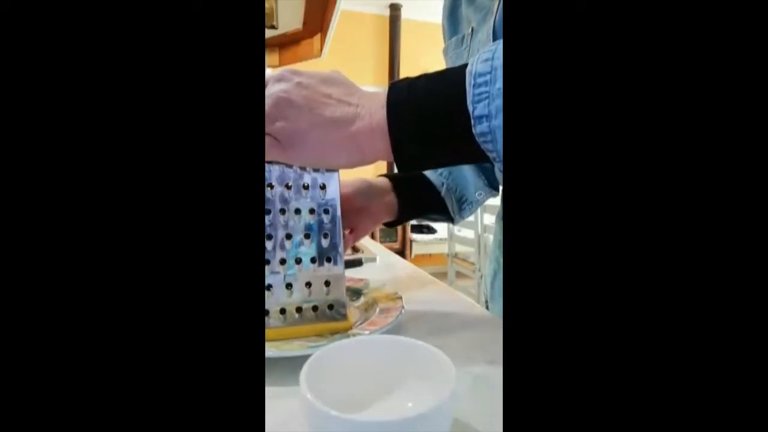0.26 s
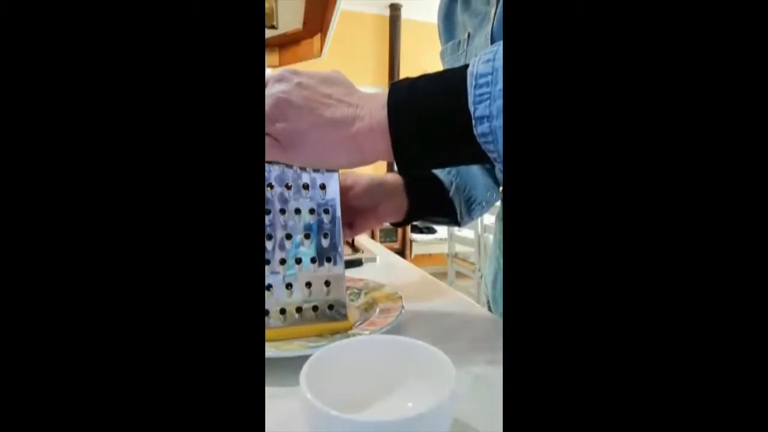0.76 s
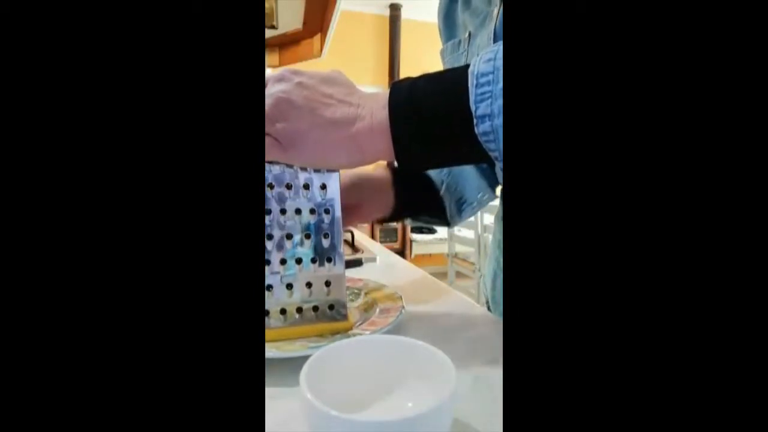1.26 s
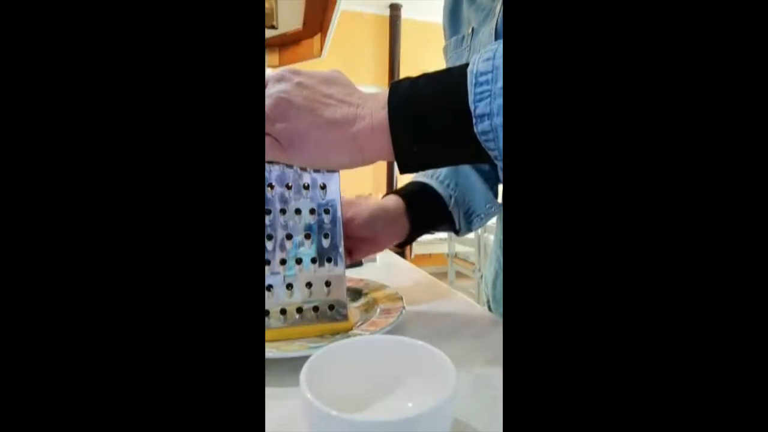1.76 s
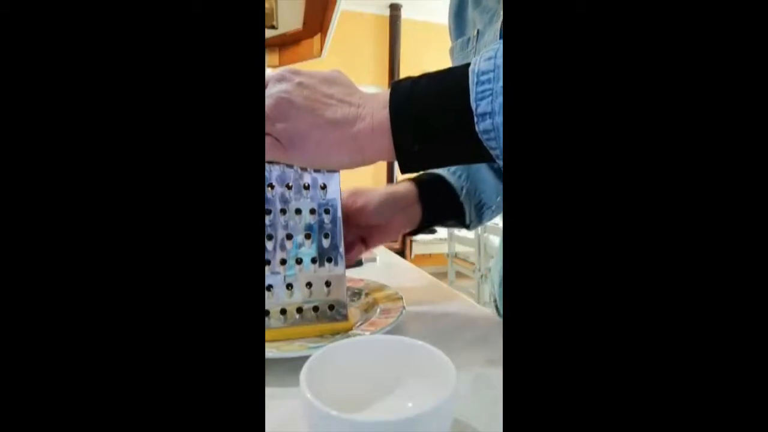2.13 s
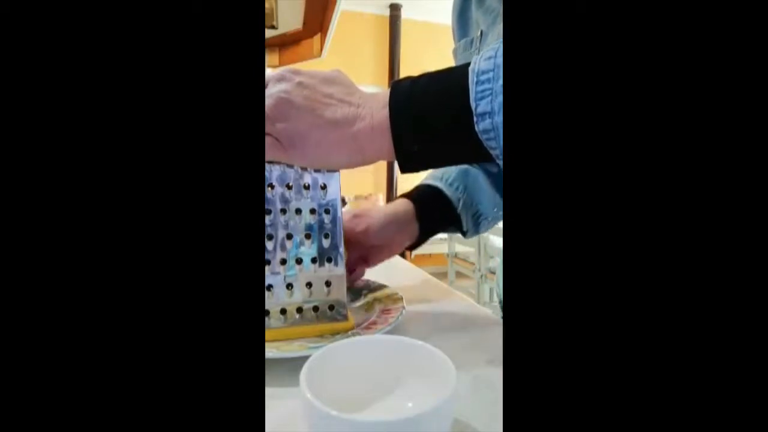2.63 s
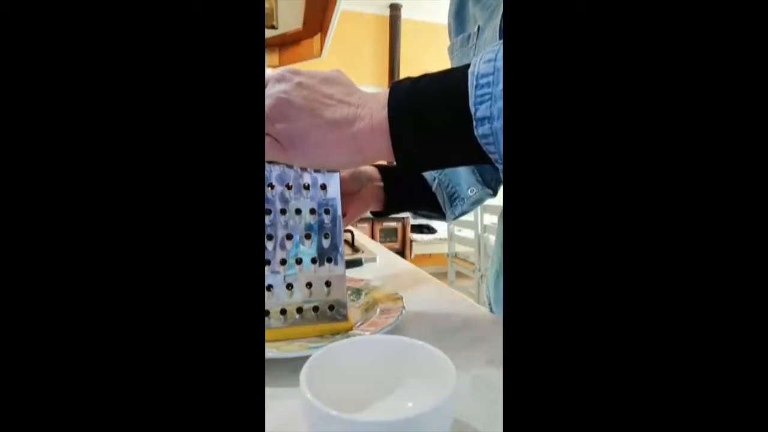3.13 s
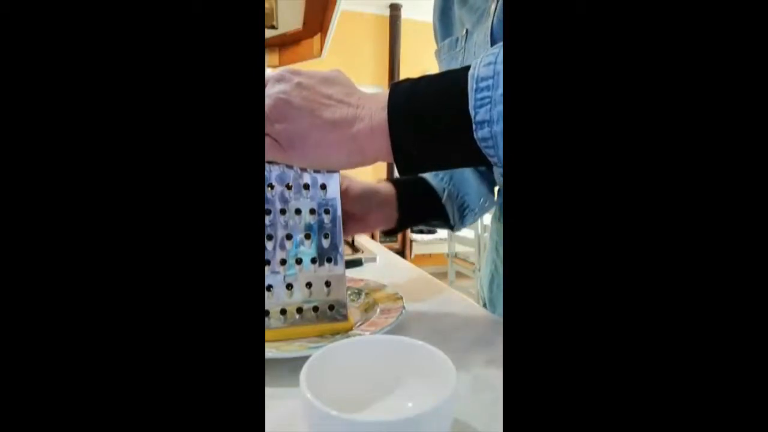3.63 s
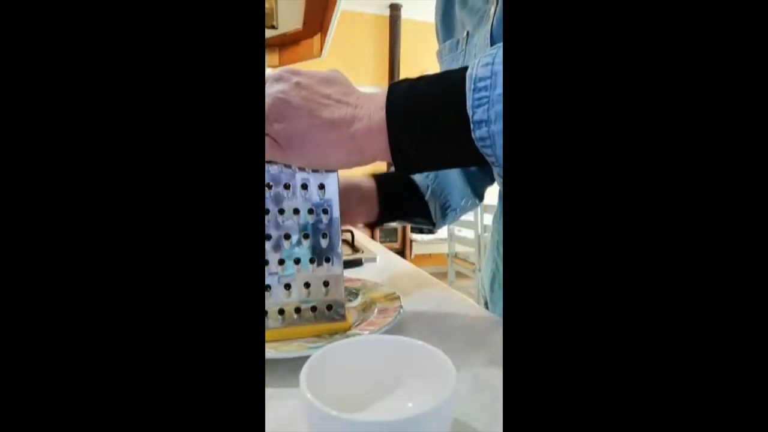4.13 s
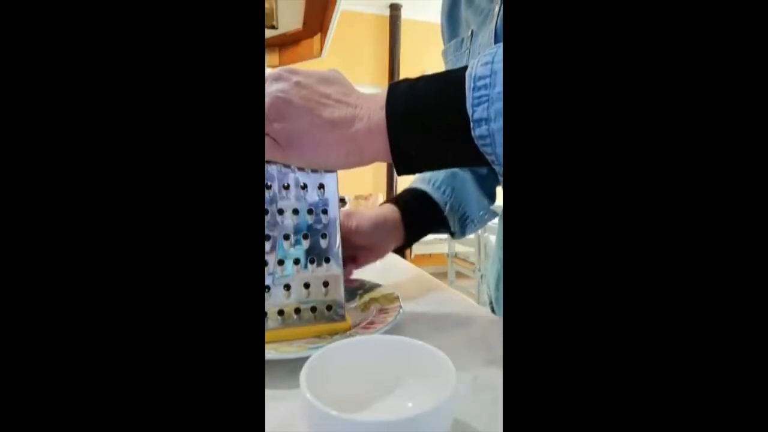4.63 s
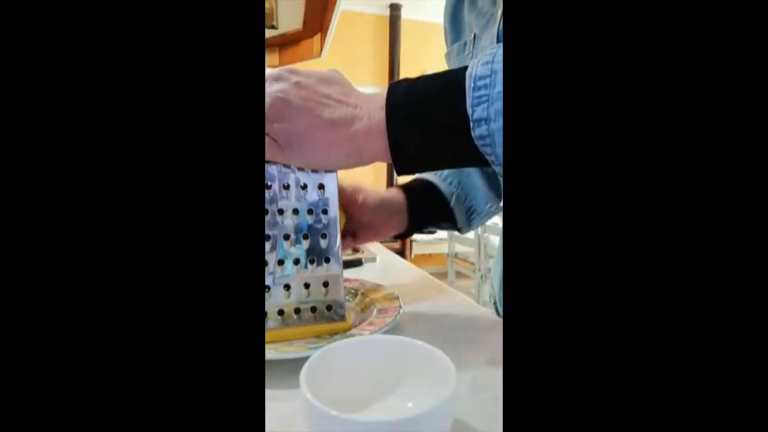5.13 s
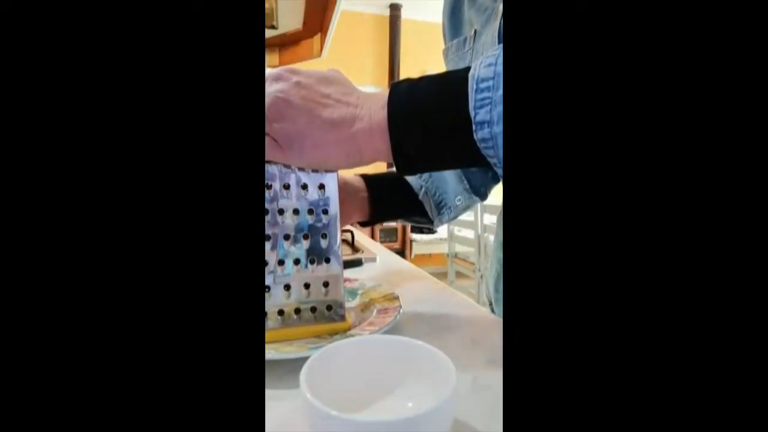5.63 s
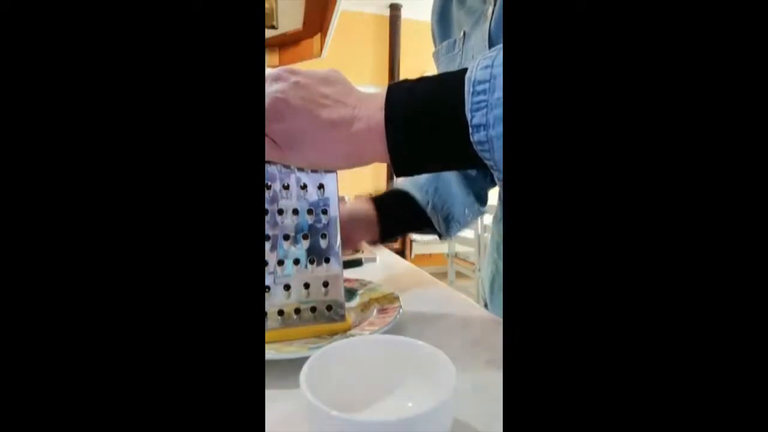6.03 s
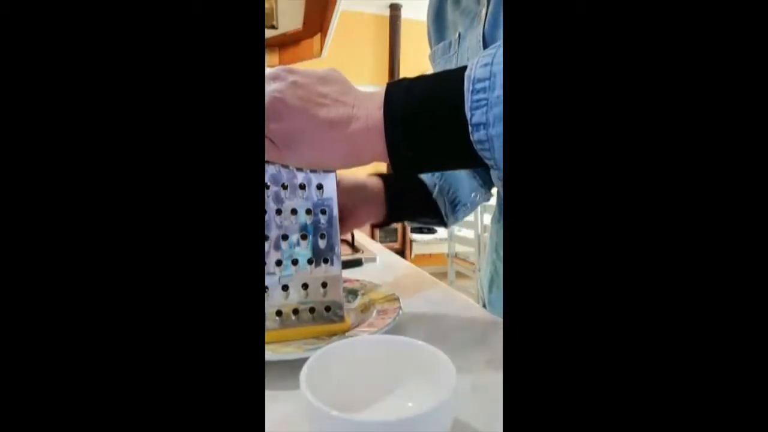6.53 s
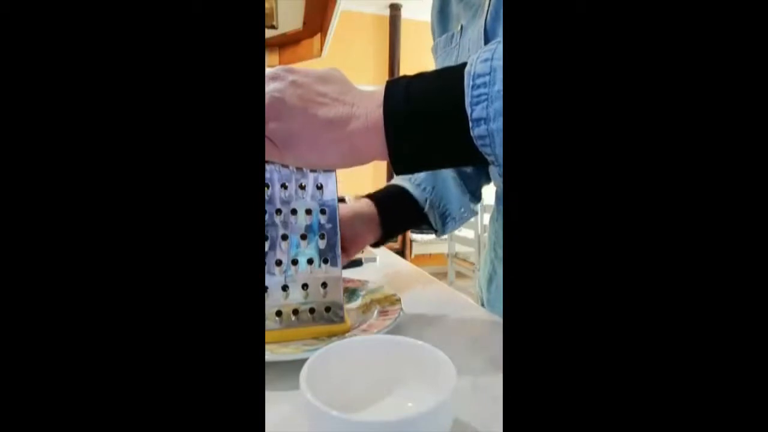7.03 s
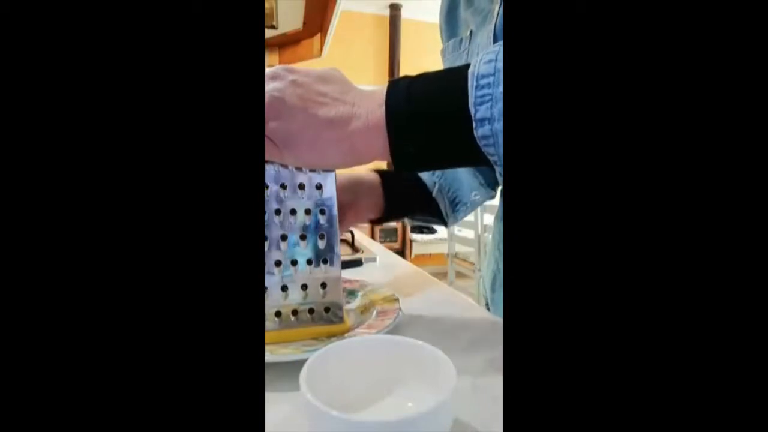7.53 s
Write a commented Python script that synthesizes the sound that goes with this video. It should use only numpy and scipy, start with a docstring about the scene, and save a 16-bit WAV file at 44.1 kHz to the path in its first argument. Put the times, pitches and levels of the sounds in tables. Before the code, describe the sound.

Very close stereo sound of lemon peel rasped on a hollow steel box grater in a small kitchen. The end of a stroke is cut off at 0 s, then its tail fades into faint hum and hiss. From about 0.5 to 2.9 s, quick strokes of a tenth of a second each follow at roughly seven a second, gritty and crackling, strongest near 2.6 s, the last two much softer. After a pause, a second steady run goes from 3.4 to 5.25 s; small dull knocks trail into the quiet. A third run starts at 6.0 s, with a brief gap near 6.85 s, and weakens after 7.4 s into a faint rubbery squeak around 7.6 s. Throughout, strokes ring the metal walls, hoot briefly around a mid pitch, and shake plate and table with low thuds; sharper snags stick out occasionally. Short room tail.

```python
"""A lemon is rasped in quick runs of strokes over a steel box grater, close to a pair of ears.
The teeth tear the peel in a dense crackle of random snaps that rings the sheet steel and the hollow box.
The drag shakes the plate below and the table top; snags, hoots, dull knocks and one faint squeak join in.
Filtered noise bursts and ringing modes make these sounds, the hoots are short unsteady sines.
A small kitchen answers with a diffuse tail, over a faint low hum and hiss of shaped noise."""
import sys
import numpy as np
from scipy import signal
from scipy.fft import rfft, irfft, next_fast_len
from scipy.io import wavfile
from scipy.ndimage import map_coordinates

SR = 44100
rng = np.random.default_rng(int(sys.argv[2]) if len(sys.argv) > 2 else 0)


def master(y):
    """Save y as 16-bit WAV."""
    cut = np.clip(np.atleast_2d(y).T, -1, 1)
    pcm = np.round(cut * 32767)  # scale
    wavfile.write(sys.argv[1], SR, pcm.astype(np.int16))


N = 342657  # samples

# strokes of the fruit over the teeth, levels before the parts are mixed:
# start_s, length_s, crest_place (0-1 of the length), rasp_db, box_db (relative to rasp_db)
STROKES = [(-0.062, 0.095, 0.67, -27, -19), (0.512, 0.11, 0.42, -28.0, -3), (0.65, 0.079, 0.77, -31, -1.5),
           (0.719, 0.05, 0.42, -28, 0.0), (0.802, 0.11, 0.5, -29, 2), (0.926, 0.11, 0.46, -27.5, -1.0),
           (1.081, 0.097, 0.62, -28.5, 0), (1.224, 0.1, 0.3, -27.0, -2.5), (1.358, 0.11, 0.74, -24.5, -5),
           (1.499, 0.11, 0.34, -29.5, -1), (1.618, 0.037, 0.55, -33, -11), (1.695, 0.13, 0.76, -32.0, -9.5),
           (1.846, 0.11, 0.32, -27.5, -3), (1.994, 0.11, 0.73, -29.5, -8.5), (2.158, 0.11, 0.42, -29.5, -2),
           (2.282, 0.11, 0.55, -25.5, -5), (2.419, 0.111, 0.47, -26.5, -4.5),
           (2.557, 0.11, 0.44, -22.5, -3), (2.707, 0.071, 0.7, -37.5, 1), (2.772, 0.091, 0.48, -40.5, 3.5),
           (3.363, 0.11, 0.65, -27.5, 0.0), (3.506, 0.12, 0.73, -31.0, -1.5),
           (3.662, 0.13, 0.55, -27, -1.5), (3.811, 0.11, 0.31, -27.0, -0.5), (3.951, 0.11, 0.4, -31.5, -3),
           (4.102, 0.108, 0.31, -30, -0.5), (4.239, 0.11, 0.63, -25.5, -2.5),
           (4.4, 0.13, 0.31, -28.5, -0.5), (4.526, 0.13, 0.58, -25.5, -4), (4.692, 0.11, 0.47, -27, -3.5),
           (4.83, 0.12, 0.4, -26.5, -6.5), (4.977, 0.099, 0.52, -27, -3.5),
           (5.117, 0.13, 0.58, -25.5, -7.5), (5.979, 0.12, 0.48, -29, -0.5), (6.108, 0.13, 0.58, -29.5, 0),
           (6.276, 0.12, 0.64, -27, -1), (6.422, 0.11, 0.53, -27.0, -1), (6.57, 0.11, 0.6, -28, 0),
           (6.704, 0.11, 0.3, -25.0, -2.5), (6.986, 0.088, 0.2, -27, -1), (7.141, 0.1, 0.44, -29, 1.5),
           (7.272, 0.12, 0.73, -26.5, -3), (7.426, 0.087, 0.52, -39.0, 2), (7.516, 0.128, 0.5, -55, 7)]


def amp(db):
    """Turn decibels into gain."""
    return 10 ** (np.asarray(db) / 20)


def unit(x):
    """Scale to rms 1."""
    return x / np.sqrt(np.mean(np.abs(x) ** 2) + 1e-20)


def along(points, hz):
    """Interpolate (hz, value) points on a log frequency axis."""
    point_hz, value = np.transpose(points)
    return np.interp(np.log(hz + 1), np.log(point_hz + 1), value)


def curve(rows):
    """Interpolate (s, value) rows to one value per sample."""
    return np.interp(np.arange(N) / SR, *np.transpose(rows))


def ears(lean_db):
    """Left and right gains for a left-minus-right level difference."""
    return amp(np.array([lean_db, -lean_db]).reshape(2, -1) / 2)


def wobble(rate):
    """A smooth random curve through `rate` random knots a second."""
    knots = rng.standard_normal(int(N * rate / SR) + 4)
    return map_coordinates(knots, [np.arange(N) * rate / SR])


def swell(moment, width):
    """A short bell-shaped burst, times in seconds: its samples and its shape."""
    first = max(int((moment - 3 * width) * SR), 0)
    last = min(int((moment + 3 * width) * SR), N)
    span = np.arange(first, last)
    return span, np.exp(-((span / SR - moment) / width) ** 2)


def filtered(x, response):
    """Multiply the spectrum of x by a complex response of frequency."""
    size = next_fast_len(N + SR // 2)
    return irfft(rfft(x, size) * response(np.fft.rfftfreq(size, 1 / SR)), size)[..., :N]


def mode(f, k, centre_hz, width_hz, db):
    """Response of one damped resonance; neighbours alternate in sign."""
    return (-1) ** k * amp(db) * 1j * f * width_hz / (centre_hz ** 2 - f * f + 1j * f * width_hz)


def resonate(x, modes):
    """Ring a set of modes, each with its own place between the ears, at unit rms response."""
    def response(f):
        return unit(sum(ears(lean_db) * mode(f, k, centre_hz, width_hz, db)
                        for k, (centre_hz, width_hz, db, lean_db) in enumerate(modes)))
    return filtered(x, response)


def roaming(x, modes, roam_db):
    """As the point of contact travels, each mode is driven now more, now less."""
    size = next_fast_len(N + SR // 2)
    f, total, power = np.fft.rfftfreq(size, 1 / SR), 0, 0
    for k, (centre_hz, width_hz, db, lean_db) in enumerate(modes):
        response = mode(f, k, centre_hz, width_hz, db)
        drive = x * unit(amp(roam_db * wobble(rate=14)))
        total = total + ears(lean_db) * response * rfft(drive, size)
        power += np.mean(np.abs(response) ** 2) * np.mean(ears(lean_db) ** 2)
    return irfft(total, size)[:, :N] / np.sqrt(power)


def spread(pair, alike):
    """Blend two unrelated signals into left and right of a given likeness (0-1) by frequency."""
    def blend(hz):
        turn = np.arccos(np.clip(along(alike, hz), -1, 1)) / 2
        return np.array([np.cos(turn), np.sin(turn)])
    mid, side = filtered(pair, blend)
    return np.array([mid + side, mid - side])


def tail(x, decay, delay):
    """A diffuse ring for each ear, `delay` seconds late; each frequency dies at its own t60."""
    hz, t, noise = signal.stft(rng.standard_normal((2, SR // 2)), SR, nperseg=256)
    fade = amp(-60 * t / along(decay, hz)[:, None])
    ring = signal.istft(noise * fade, SR, nperseg=256)[1]
    ring = np.pad(ring / np.linalg.norm(ring[0]), ((0, 0), (int(delay * SR), 0)))
    return signal.fftconvolve(x, ring, axes=1)[:, :N]


def tears(rate, scatter_db):
    """Tiny snaps, `rate` a second, at random moments and of uneven size, rms 1."""
    count = int(rate * N / SR)
    when, size = rng.integers(0, N, count), rng.standard_normal(count)
    heights = amp(scatter_db * np.minimum(size, 2)) * rng.choice([-1, 1], count)
    return unit(np.bincount(when, heights, N))


def hand():
    """Force on walls, box, plate and table: each stroke bites, swells to its crest and lets go."""
    bite_s, release_s = 0.017, 0.026
    # shares of the force at the crest
    bite_grip, release_grip, box_bite_grip, box_release_grip = 0.52, 0.62, 0.52, 0.49
    # force on plate and table at a firm stroke, before the mix
    firm_db, plate_firm_db, table_firm_db = -29, -38, -41.5
    plate_grows, table_grows = 0.64, 0.7  # dB per dB of stroke, the table only up to a firm one
    t, force = np.arange(N) / SR, np.zeros((4, N))
    for start, length, place, db, box_db in STROKES:
        crest = length * np.clip(place, 0, 1)
        bite_end, release = min(bite_s, crest), max(length - release_s, crest)
        moments = start + np.array([0, bite_end, crest, release, length])
        span = slice(max(int(start * SR), 0), int((start + length) * SR))
        grip = np.abs(np.interp(t[span], moments, [0, bite_grip, 1, release_grip, 0]))
        push = np.interp(t[span], moments, [0, box_bite_grip, 1, box_release_grip, 0])
        drag = np.sqrt(grip)  # the fruit still drags when it is too slow to cut
        plate_db = plate_firm_db + plate_grows * (db - firm_db)
        table_db = table_firm_db + table_grows * min(db - firm_db, 0)
        force[:, span] += [amp(db) * grip, amp(db + box_db) * push,
                           amp(plate_db) * drag, amp(table_db) * drag]
    return force


def rasp(force, patch_count=3):
    """Peel tears on many teeth at once; the sheet steel smears each snap and rings."""
    # tearing peel as the steel walls radiate it: hz, density_db (per Hz, relative)
    peel = [(150, -18), (500, -3.5), (900, -0.5), (1300, 3), (1800, 1), (2200, -1.5), (3000, 0.5),
            (4000, 1), (5200, -1), (6700, 1.5), (8500, 0), (10500, -8.5), (13000, -12.5), (16000, -20)]
    # modes of the steel walls: centre_hz, width_hz, level_db (relative), left_minus_right_db
    steel_modes = [(1535, 21, -4.5, -6), (1687, 55, 3, -1), (1760, 72, 1, 8), (1898, 57, -4.5, -21),
                   (2230, 19, -10, -9), (2590, 31, 3, 8.5), (3058, 36, -11, -14), (3300, 82, 3.5, 1),
                   (3388, 45, 2, -1), (4150, 180, -5, -11), (4600, 120, -2.5, 2), (6570, 50, 2, 5),
                   (8620, 90, -7, -3), (9130, 53, 0, -3)]
    # balance of the rasp between the ears: hz, left_minus_right_db
    lean = [(300, -3), (700, -7), (1300, -3), (2300, 0), (4200, -1.5), (6500, -.5), (8000, -3.5),
            (10000, -9), (15000, -12)]
    # likeness of the rasp at the two ears: hz, likeness (0-1)
    alike = [(300, 0.77), (1300, 0.72), (3000, 0.067), (10000, 0.038)]
    ear_lag_s = 0.00009  # the rasp reaches the left ear first
    snaps = force * np.array([tears(rate=4000, scatter_db=3.5), tears(rate=4000, scatter_db=5.5)])
    direct = filtered(spread(snaps, alike),
                      lambda hz: np.exp(-2j * np.pi * np.outer([0, ear_lag_s], hz)))
    # as the fruit travels, different patches of the wall take over, each with its own ring
    patches = np.array([wobble(rate=12) for _ in range(patch_count)])
    patches /= np.linalg.norm(patches, axis=0)
    patch_t60 = [(1000, 0.079), (10000, 0.044)]  # hz, t60_s
    sheet = direct + sum(tail(direct * patch, patch_t60, delay=0.0005) for patch in patches)
    crackle = filtered(sheet, lambda hz: unit(amp(along(peel, hz)) * ears(along(lean, hz))))
    ringing = roaming(snaps[0], steel_modes, roam_db=3.5)
    return amp(-3.5) * crackle + amp(-8.0) * ringing


def grater(table_top_hz=140):
    """Teeth catch and release the fruit, so that walls, box and plate shudder together."""
    # modes of the hollow box: centre_hz, width_hz, level_db (relative), left_minus_right_db
    box_modes = [(523, 35, -9, -8), (786, 18.5, -3, -6), (925.4, 37, -2.5, -9), (999, 94, 0, -10),
                 (1092, 80, -0.5, -5), (1187, 41, -6, -8), (1282, 55, -6.5, -2), (1346, 56, -2.5, -2),
                 (1439, 51, -9, -1)]
    # modes of the plate under it: centre_hz, width_hz, level_db (relative), left_minus_right_db
    plate_modes = [(254.4, 80, -0.5, 1), (303.4, 43, 3.5, -3.5), (341.5, 33, 2, 1), (452, 86, -13.5, -21.5)]
    # modes of the table top: centre_hz, width_hz, level_db (relative), left_minus_right_db
    table_modes = [(78, 20, -12.5, -2.5), (106.7, 11, -3.5, 1.5), (120, 15.8, -1, -1.5)]
    walls, box, plate, table = hand()
    catch, knock = wobble(rate=110), settling()

    tearing = np.hypot(walls * unit(amp(0.86 * catch)), snags())
    steel = rasp(tearing + amp(-6.0) * knock)

    box_force = box * unit(amp(2.1 * catch)) + amp(1.5) * knock
    hollow = roaming(box_force * tears(rate=1500, scatter_db=3), box_modes, roam_db=3.5)

    plate_force = plate * unit(amp(2.6 * catch)) + amp(-0.5) * knock
    china = resonate(plate_force * tears(rate=900, scatter_db=2.0), plate_modes)

    table_force = table + amp(3.5) * knock
    wood = resonate(table_force * tears(rate=600, scatter_db=1.5), table_modes)
    # the table top gives only a low thud, with little above table_top_hz
    wood = filtered(wood, lambda hz: 1 / np.hypot(1, (hz / table_top_hz) ** 6))
    return steel + amp(1.33) * hollow + amp(-1.35) * china + amp(-0.9) * wood


def judders(width=0.0067, waver=0.34):
    """Stick-slip at the crest of a stroke makes the box hoot at an unsteady pitch, soft pushes faintly."""
    pitch_hz, scatter_hz = 1049, 25.97
    level_db, onset_db = 2, -28  # relative to the push; push below which the hoot fades twice as fast
    hoot, drift = np.zeros(N), waver * wobble(rate=300)  # drift in radians
    chances = rng.standard_normal((len(STROKES), 2))
    for (start, length, place, db, box_db), (detune, phase) in zip(STROKES, chances):
        span, shape = swell(start + place * length, width)
        push_db, hz = db + box_db, pitch_hz + scatter_hz * detune
        level = amp(push_db + level_db + min(push_db - onset_db, 0))
        hoot[span] += level * shape * np.sin(2 * np.pi * (hz * span / SR + phase) + drift[span])
    return hoot * ears(lean_db=-8.0)


def kitchen_air():
    """A low hum and a soft hiss of shaped noise, louder at first, then nearly steady."""
    # colour of the quiet kitchen: hz, density_db (per Hz, relative)
    air_colour = [(20, -25), (45, 5), (58, -13), (75, 7.5), (95, -9.5), (120, -9.5), (165, -13),
                  (400, -21.5), (700, -24.5), (1000, -14.5), (2500, -21.5), (7000, -19.5), (10000, -22),
                  (16000, -37)]
    # level of the background, louder at first as the room tail of earlier strokes fades,
    # then nearly steady: time_s, level_db
    quiet = [(.15, -54), (.48, -58.5), (7.75, -60)]
    alike = [(30, 1.0), (100, 0.96), (1000, 0.26), (4000, 0.066)]  # hz, likeness (0-1)
    lean = [(200, -1), (5000, -2.5), (12000, -8.5)]  # hz, left_minus_right_db
    air = spread(rng.standard_normal((2, N)), alike)
    air = filtered(air, lambda hz: amp(along(air_colour, hz)) * ears(along(lean, hz)))
    return amp(curve(quiet) + 0.9 * wobble(rate=8)) * unit(air)


def snags(width=0.0032):
    """A tooth rips out a larger shred: brief surges of tearing force."""
    # surges, levels before the mix: time_s, force_db
    shreds = [(.709, -25), (1.15, -22), (2.361, -22), (3.689, -29.5), (3.995, -27.5), (6.032, -23),
              (6.797, -22.5)]
    force = np.zeros(N)
    for moment, db in shreds:
        span, shape = swell(moment, width)
        force[span] += amp(db) * shape
    return force


def settling(fade_time=0.017):
    """The grater rocks and settles on the plate: sudden forces that die away, for dull little knocks."""
    # knocks, levels before the mix: time_s, force_db
    settles = [(1.73, -37), (3.053, -52), (4.549, -36), (5.244, -46), (5.315, -56), (5.475, -51),
               (5.821, -58.5), (6.124, -62), (6.825, -50)]
    t = np.arange(N) / SR
    return sum(amp(db) * (t > start) * np.exp(-np.abs(t - start) / fade_time)
               for start, db in settles)


def skid():
    """Wet peel skids over the smooth steel and squeaks faintly: a swell of snaps rings a few modes."""
    # modes of the rubbery squeak: centre_hz, width_hz, level_db (relative), left_minus_right_db
    squeak_modes = [(975, 100, 4, -11), (1480, 67, -6, 7), (3360, 110, -4, 2), (4871.4, 90, -8, 3)]
    at_s, width_s, rub_db = 7.602, 0.046, -47.5
    rub = np.zeros(N)
    span, shape = swell(at_s, width_s)
    rub[span] = amp(rub_db) * shape
    return resonate(rub * tears(rate=1300, scatter_db=2.5), squeak_modes)


def scene():
    """The grater close by, the kitchen around it."""
    # decay of the small kitchen: hz, t60_s
    kitchen_t60 = [(100, 0.43), (400, 0.43), (2000, 0.39), (7000, 0.31), (15000, 0.25)]
    # level of the kitchen's answer relative to the close sound: hz, level_db
    wet = [(100, -16), (400, -10.5), (1000, -14), (2500, -13), (7000, -12), (14000, -13)]
    near = grater() + judders() + skid()
    room = filtered(tail(near, kitchen_t60, delay=0.006), lambda hz: amp(along(wet, hz)))
    return near + room + kitchen_air()


def record(dry):
    """Nothing is kept above the band limit."""
    top_hz = 15850
    return filtered(dry, lambda hz: hz < top_hz)


dry = scene()
out = record(dry)
master(out)
```